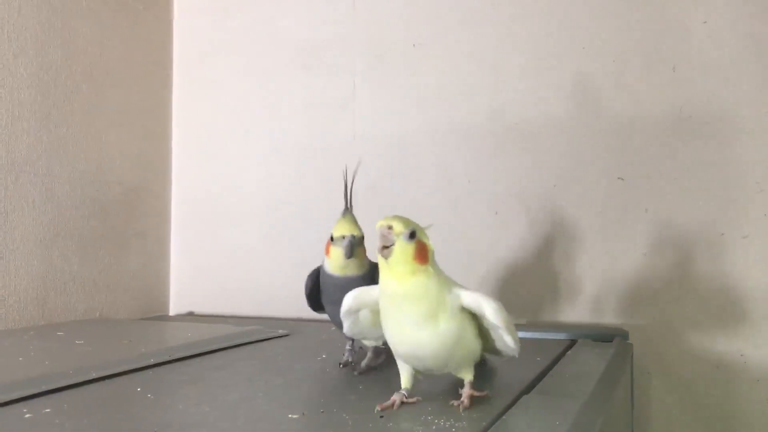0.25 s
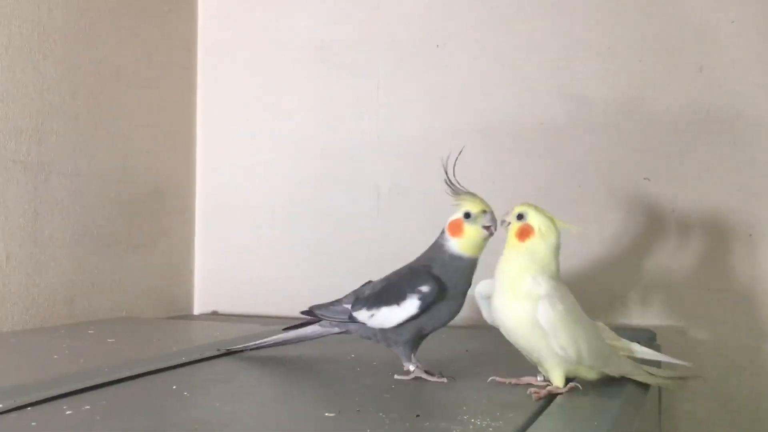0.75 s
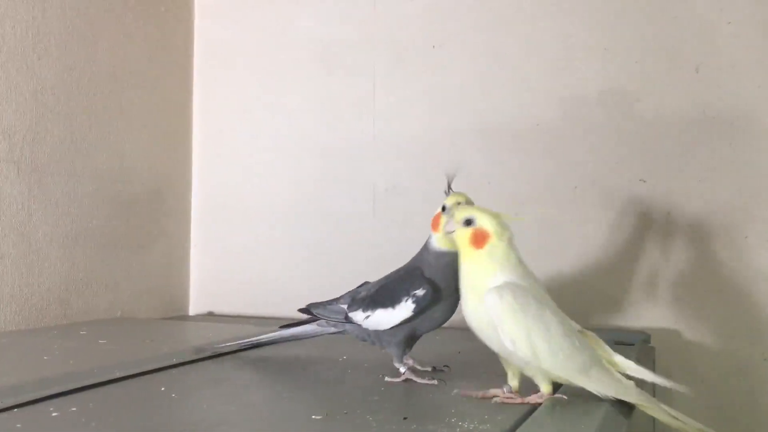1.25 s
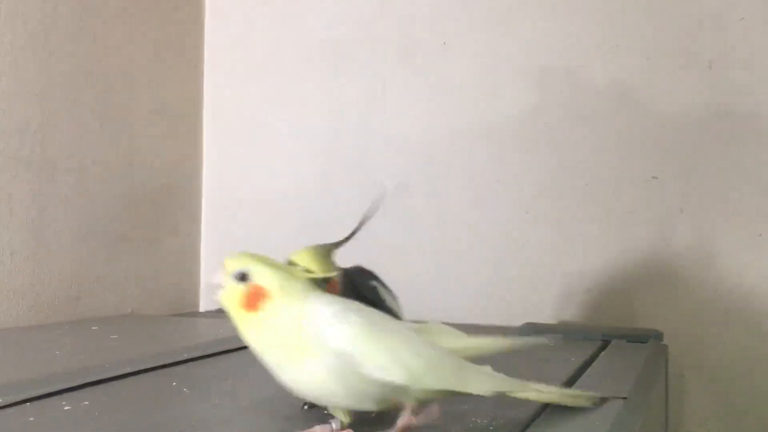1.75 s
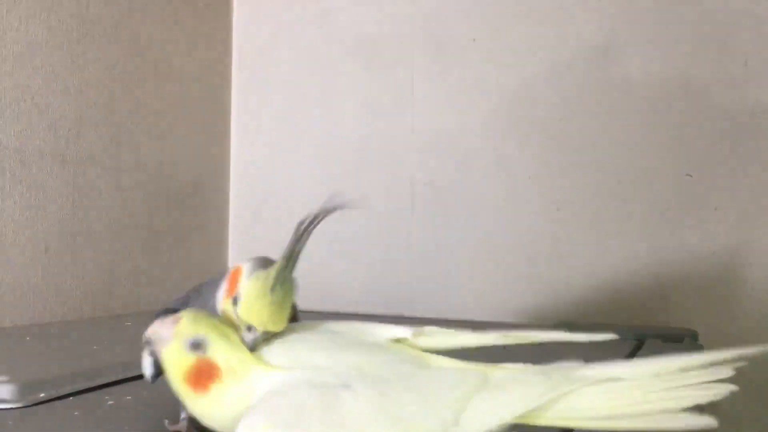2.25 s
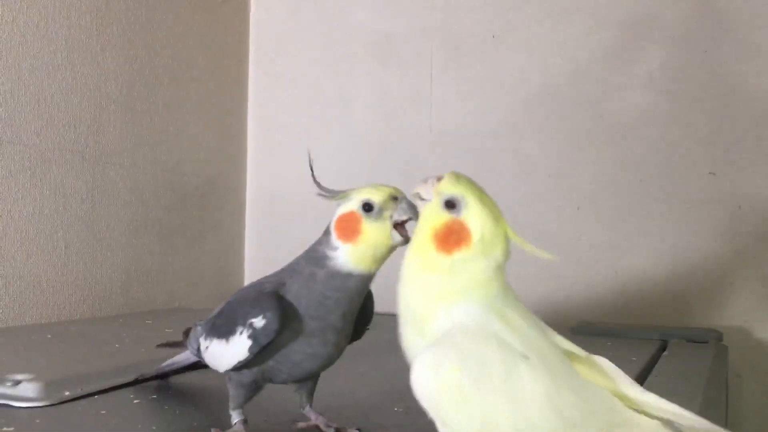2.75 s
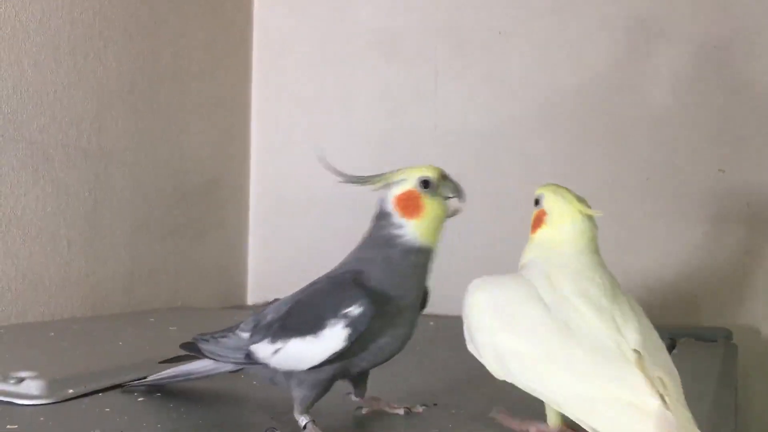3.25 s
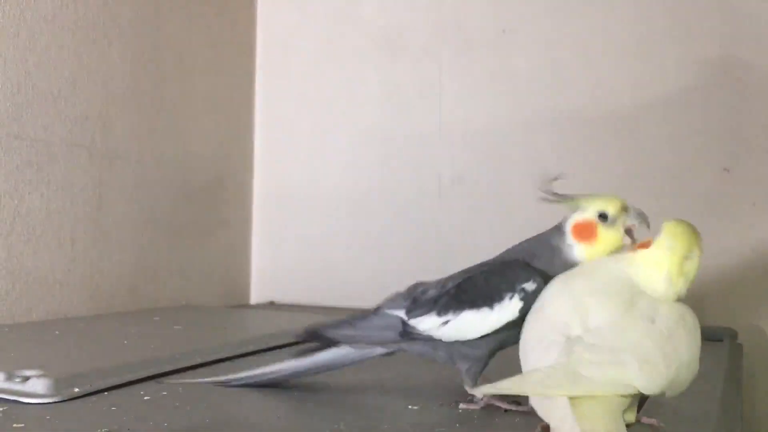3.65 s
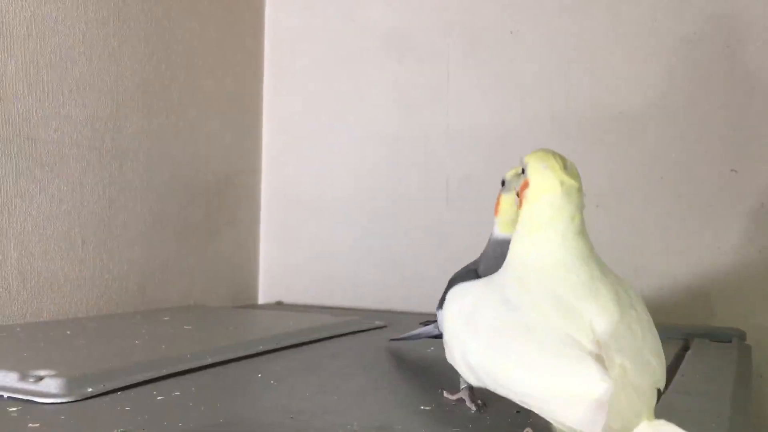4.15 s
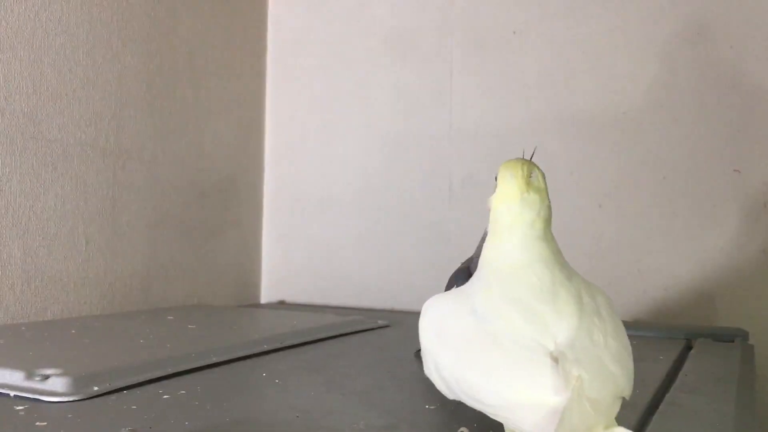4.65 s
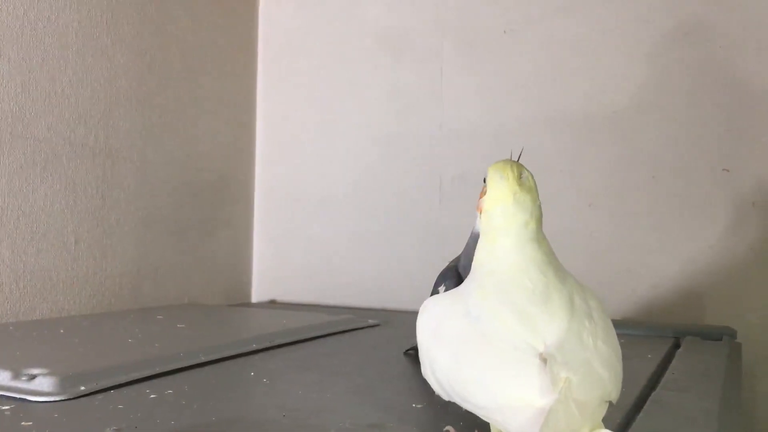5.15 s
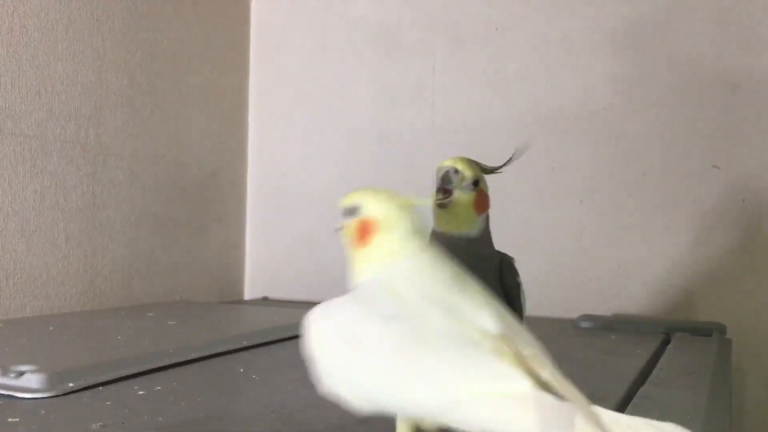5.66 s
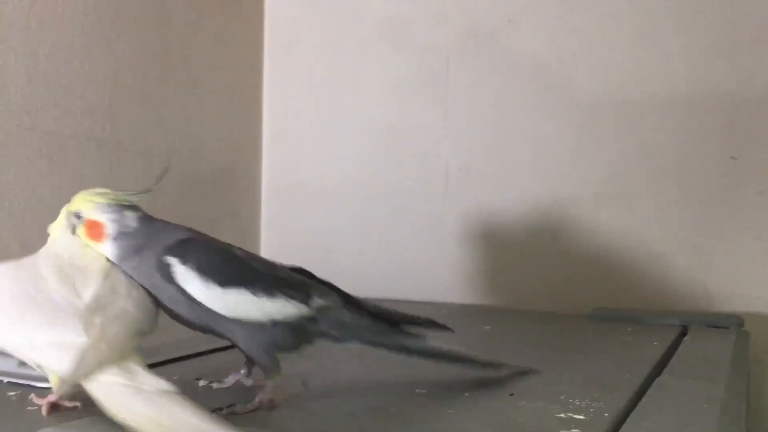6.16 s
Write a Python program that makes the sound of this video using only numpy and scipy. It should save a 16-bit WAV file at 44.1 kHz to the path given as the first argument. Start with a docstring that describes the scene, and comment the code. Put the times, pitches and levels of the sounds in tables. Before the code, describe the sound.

Over a faint low refrigerator hum, a pet cockatiel whistles a short climbing phrase, breaks into a string of high chirps and scratchy notes, then repeats the phrase. Small beak clicks and dull little footsteps come between the notes as two birds shuffle about, with a light scuffle near the end. The microphone is near, and bare walls add a short ring.

```python
"""A cockatiel courts its mate on top of a humming refrigerator in the corner of a bare room.
Its syrinx whistles short gliding notes, some pure and some rasping with fluttering membranes,
their overtones coloured by throat and beak. Beaks click; feet tap and feathers brush the top panel.
The close walls make each glide beat against its own echo."""
import sys
import numpy as np
from scipy import signal
from scipy.fft import rfft, irfft, next_fast_len
from scipy.io import wavfile
from scipy.ndimage import uniform_filter1d

SR = 44100
rng = np.random.default_rng(int(sys.argv[2]) if len(sys.argv) > 2 else 0)


def transcribe(signal):
    """Save signal, clipped to [-1, 1], as a 16-bit WAV file at the path in sys.argv[1]."""
    frames = np.atleast_2d(signal).T
    limited = np.clip(frames, -1, 1)
    pcm = np.round(limited * 32767).astype(np.int16)
    wavfile.write(sys.argv[1], SR, pcm)


N = 282681
TIME = np.arange(N) / SR
CUTOFF_HZ = 16300
SCOOP_S = .018   # time constant of a note's slide up onto its pitch

# bright spectrum of a beak or claw click: (frequency [Hz], level [dB])
CLICK_COLOUR = [(400, -19.5), (1200, 7.5), (3000, -1), (9000, 0), (16000, -4.5)]
# duller spectrum of the top panel when touched: (frequency [Hz], level [dB])
PANEL_COLOUR = [(100, -7), (650, -3.5), (1200, 3.5), (2200, -5), (4000, -13), (16000, -20)]


def from_db(db):
    return 10 ** (np.asarray(db) / 20)


def rms_one(x):
    return x / np.sqrt(np.mean(x ** 2) + 1e-20)


def follow(rows, t):
    """The columns of a breakpoint curve at times t."""
    times, *columns = np.transpose(rows)
    return [np.interp(t, times, column) for column in columns]


def at_hz(points, hz):
    """A spectrum read on a log-frequency axis."""
    freqs, values = np.transpose(points)
    return np.interp(np.log(np.maximum(hz, 1)), np.log(freqs), values)


def coloured_noise(spectrum, size):
    """Noise of rms 1 with the given spectrum."""
    hz = np.fft.rfftfreq(size, 1 / SR)
    return rms_one(irfft(rfft(rng.standard_normal(size)) * from_db(at_hz(spectrum, hz)), size))


def waver(rate_hz, size):
    """Smooth random modulation of rms 1."""
    pole = np.exp(-2 * np.pi * rate_hz / SR)
    return rms_one(signal.lfilter([1], [1, -2 * pole, pole ** 2], rng.standard_normal(2 * size))[size:])


def add(track, start_s, sound):
    """Lay a sound into a track."""
    at = max(int(start_s * SR), 0)
    track[at:at + len(sound)] += sound[:len(track) - at]


def reflections(t, order=14, sound_speed=343):
    """Mirror images of the bird in the walls, then a diffuse wash, relative to the direct sound."""
    room_m, bird_m, microphone_m = (3.3, 2.6, 2.8), (.62, .47, 1.72), (.87, .66, 1.83)
    mirrors = np.mgrid[(slice(-order, order + 1),) * 3].reshape(3, -1).T
    images = mirrors * np.array(room_m) + np.where(mirrors % 2, np.subtract(room_m, bird_m), bird_m)
    path = np.linalg.norm(images - microphone_m, axis=1)
    direct = path.min()
    lag = np.round((path - direct) / sound_speed * SR).astype(int)
    polarity = (-1.) ** mirrors.sum(axis=1)
    early = np.bincount(lag, (lag > 0) * polarity * direct / path, len(t))[:len(t)]
    late = direct * np.sqrt(4 * np.pi * sound_speed / (np.prod(room_m) * SR)) * rng.standard_normal(len(t))
    return np.where(t < (order - 1) * min(room_m) / sound_speed, early, late)


def room(x, wet_db=0.03):
    """Direct sound plus the ring of bare walls, whose treble dies first."""
    # reverb decay by band: (frequency [Hz], T60 [s])
    decay = [(2500, 0.27), (5500, 0.26), (9000, 0.14), (16000, 0.22)]
    centres, t60s = np.transpose(decay)
    t = TIME[:SR * 2 // 3]
    hz, echoes = np.fft.rfftfreq(len(t), 1 / SR), rfft(reflections(t))
    response = 0
    for share, t60 in zip(np.eye(len(centres)), t60s):
        band = irfft(echoes * at_hz(np.c_[centres, share], hz), len(t))
        response += band * from_db(-60 * t / t60)
    return x + from_db(wet_db) * signal.fftconvolve(x, response)[:N]


def refrigerator(unsteady=0.24, rush_db=-54.5):
    """Wavering compressor tones over a soft rush of air."""
    # compressor tones: (frequency [Hz], level [dB])
    tones = [(39.2, -61.5), (60, -65), (85.5, -59.5), (89.2, -56), (170, -77.5), (236, -78.5)]
    # spectrum of the rush: (frequency [Hz], level [dB])
    rush_colour = [(18, -30), (30, 0), (95, -6), (374, -19.5), (499, -17), (632, -20.5), (1960, -22.5),
                   (4910, -37.5), (13300, -39), (16000, -46)]
    hum = 0
    for hz, db in tones:
        tone = np.sqrt(2) * np.sin(2 * np.pi * (hz * TIME + rng.random()))
        hum += from_db(db) * tone * (1 + unsteady * waver(2.2, N))
    return hum + from_db(rush_db) * coloured_noise(rush_colour, next_fast_len(N))[:N]


def scuffle(grain_db=4):
    """Feathers and claws brush the panel, soft and grainy, while the birds move."""
    # brushing envelope: (time [s], level [dB])
    brushing = [(1.38, -77), (1.56, -55), (2.1, -60.5), (2.7, -72), (5.5, -71.5), (5.72, -59.5),
                (5.91, -68.5), (5.99, -49.5), (6.08, -60.5)]
    level_db, = follow(brushing, TIME)
    envelope = from_db(level_db + grain_db * waver(50, N))
    return envelope * coloured_noise(PANEL_COLOUR, next_fast_len(N))[:N]


def knocks(events, colour, t60, gain_db, rise_s=.002):
    """Each contact is a short burst of dense, quickly dying vibration."""
    out, t = np.zeros(N), TIME[:SR // 10]
    for start_s, level_db in events:
        envelope = from_db(level_db + gain_db - 60 * t / t60) * np.minimum(t / rise_s, 1)
        add(out, start_s, coloured_noise(colour, len(t)) * envelope)
    return out


def claws(count=28, mean_db=-52, spread_db=4):
    """Faint random ticks of claws as the birds shuffle about."""
    draws = rng.random((count, 2))
    ticks = [(when * TIME[-1], mean_db + spread_db * (2 * force - 1)) for when, force in draws]
    return knocks(ticks, CLICK_COLOUR, t60=0.0054, gain_db=-3.5)


def feet():
    """Feet land on the top panel with dull taps."""
    # footfalls: (time [s], relative level [dB])
    steps = [(.289, -40.5), (1.518, -41), (1.598, -33.5), (1.768, -39), (1.878, -59), (2.04, -34.5),
             (2.078, -31.5), (2.2614, -42.5), (2.5367, -36.5), (4.128, -39.5), (5.8018, -34),
             (5.8746, -40.5), (5.939, -38), (6.0103, -29.5), (6.1186, -28.5), (6.2229, -32)]
    return knocks(steps, PANEL_COLOUR, t60=0.062, gain_db=-2.5)


def beaks():
    """Hard beaks make short, bright clicks."""
    # beak contacts: (time [s], relative level [dB])
    clicks = [(.870, -26.5), (1.006, -47), (1.226, -50.5), (1.403, -39.5), (1.516, -48), (1.592, -28.5),
              (1.669, -29.5), (1.878, -32.5), (2.332, -34), (2.803, -30), (3.284, -42.5), (3.607, -30.5),
              (3.859, -22.5), (5.502, -51), (5.565, -49), (6.341, -32)]
    return knocks(clicks, CLICK_COLOUR, t60=0.053, gain_db=-2.0)


def moments(length_s, count=200):
    """Times within a note, and the share of it that has gone by."""
    share = np.linspace(0, 1, count)
    return share * length_s, share


def effort(t, attack_s, start_db, release_s, end_db):
    """Attack, hold and release of a note, in dB from its full level."""
    return start_db * np.maximum(1 - t / attack_s, 0) + end_db * np.maximum(1 - (t[-1] - t) / release_s, 0)


def dip(t, after_s, depth_db, width_s=.018):
    """A brief hollow in the fundamental, in dB."""
    return depth_db * np.exp(-((t - after_s) / width_s) ** 2)


def tune(shape, length_s, low_hz, high_hz, level_db, overtone_db):
    """A practised tune stretched to a length and range: curves of time, pitch, level and overtones."""
    share, climb, loud_db, bright_db = np.transpose(shape)
    pitch = low_hz * (high_hz / low_hz) ** climb
    return (share - share[0]) * length_s, pitch, level_db + loud_db, overtone_db + bright_db


def rise(*settings):
    """A whistle that pauses on a step and then climbs."""
    # rising tune: (time [share of length], pitch [share of range], level [dB], overtones [dB])
    shape = [(0, 0.059, -26, -7.5), (.15, .22, -5, -5), (.33, .29, -9.5, 0), (.47, .62, 1, -0.5),
             (.645, .745, 1.5, -3.5), (.8, .895, -4.5, -0.5), (1, 0.96, -15, 0)]
    return tune(shape, *settings)


def arch(length_s, low_hz, high_hz, level_db, overtone_db, flat, step_share=0.28, step_width=.13):
    """A whistle that climbs three steps and falls away; the first step may land flat."""
    # arched tune: (time [share of length], pitch [share of range], level [dB], overtones [dB])
    shape = [(0, .02, -30.5, -4), (.12, 0.045, -14.5, -14), (.205, 0.24, -13.5, -9),
             (.275, 0.57, -2.5, -6.5), (.41, 0.58, 0.5, -1), (.555, 0.73, 0.5, 9.5), (.645, .93, -1.5, 7),
             (.785, 0.98, 0.5, 2), (.885, 0.91, -2.5, 3), (1, 0.215, -12, -22)]
    t, pitch, loud_db, bright_db = tune(shape, length_s, low_hz, high_hz, level_db, overtone_db)
    bend = -flat * np.exp(-((t / length_s - step_share) / step_width) ** 2)
    return t, pitch * 2 ** (bend / 12), loud_db, bright_db


def glide(from_hz, to_hz, share, semitones):
    """An even slide between two pitches, with a bend on top."""
    return from_hz * (to_hz / from_hz) ** share * 2 ** (semitones / 12)


def sweep(length_s, from_hz, to_hz, scoop, level_db, dip_s, dip_db, first_overtone_db, last_overtone_db):
    """A note scooped from below that starts bright and mellows as it glides."""
    t, share = moments(length_s)
    pitch = glide(from_hz, to_hz, share, semitones=-scoop * np.exp(-t / SCOOP_S))
    loud_db = effort(t, attack_s=0.036, start_db=-15, release_s=0.018, end_db=-5.5)
    bright_db = first_overtone_db + (last_overtone_db - first_overtone_db) * share
    hollow_db = dip(t, dip_s, dip_db)
    return t, pitch, level_db + loud_db + hollow_db, bright_db - hollow_db


def chirp(length_s, from_hz, to_hz, warble_s, depth, width_s, level_db, swell_db, overtone_db, scoop=1.3):
    """A short high glide whose pitch swings once, overshooting before and after."""
    t, share = moments(length_s)
    away = ((t - warble_s) / width_s) ** 2
    warble = depth * (1 - 2 * away) * np.exp(-away)
    pitch = glide(from_hz, to_hz, share, semitones=warble - scoop * np.exp(-t / SCOOP_S))
    loud_db = effort(t, attack_s=0.036, start_db=-12, release_s=0.024, end_db=-13.5)
    loud_db += swell_db * (share - .5)
    thin_db = -2.5 * warble   # the voice thins as it flicks up and fills as it dips
    return t, pitch, level_db + loud_db + thin_db, overtone_db - thin_db


def held(length_s, from_hz, to_hz, bow, plunge_s, plunge, level_db, dip_s, dip_db, overtone_db,
         brighten_db=17, dull_db=-19):
    """A gently curved whistle that grows brighter, then drops in pitch and goes dull."""
    t, _ = moments(length_s)
    hold_s = length_s - plunge_s
    share, fall = np.minimum(t / hold_s, 1), np.maximum(t - hold_s, 0) / plunge_s
    pitch = glide(from_hz, to_hz, share, semitones=bow * np.sin(np.pi * share) - plunge * fall)
    loud_db = effort(t, attack_s=0.039, start_db=-19, release_s=0.044, end_db=-12.5)
    bright_db = overtone_db + brighten_db * (share - .5) + dull_db * fall
    hollow_db = dip(t, dip_s, dip_db)
    return t, pitch, level_db + loud_db + hollow_db, bright_db - hollow_db


def syrinx(curves, rasp, tilt, nasal_db=0):
    """One whistle: a fundamental, overtones coloured by the throat, and rasp from fluttering membranes."""
    # how throat and beak pass the overtones: (frequency [Hz], gain [dB])
    throat = [(2200, 13.5), (3000, -5), (3700, -5), (4700, -7.5), (5600, -5.5), (6700, -16.5),
              (7800, -14.5), (9200, -27), (10700, -27), (12700, -17), (15500, -24)]
    # spectrum of the breath: (frequency [Hz], level [dB])
    breath_colour = [(500, -30), (1300, 3), (2700, -8), (3700, -2.5), (7000, -15.5), (16000, -18.5)]
    attack_s, release_s, settle_s, voice_db = 0.0034, .008, 0.083, -2.0
    flutter_hz, flutter_depth, flutter_bend = 92, 0.55, 0.07
    nasal_hz, nasal_octaves = 3650, 0.29
    t = np.arange(0, curves[0][-1] + release_s, 1 / SR)
    size = len(t)
    pitch, level_db, overtone_db = follow(np.column_stack(curves), t)
    pitch = uniform_filter1d(pitch, SR // 100, mode="nearest")   # muscles round the corners of a glide
    # a harsh note starts with fluttering membranes, then settles; a plunge breaks the tone up again
    plunge = np.clip(-np.gradient(np.log2(pitch)) * SR - 6, 0, 10)   # octaves per second beyond 6
    strain = rasp * np.exp(-t / settle_s)
    rough = np.minimum(strain + 0.084 * plunge, 1)
    flutter_rate = flutter_hz * (1 + 0.11 * waver(30, size))
    flutter = rough * np.sin(2 * np.pi * np.cumsum(flutter_rate) / SR)
    jitter = .0022 * waver(120, size)
    wobble = 0.03 * rasp * waver(38, size)
    chaos = .035 * rough * waver(600, size)
    pitch = pitch * (1 + jitter + wobble + chaos + flutter_bend * flutter)
    phase = 2 * np.pi * np.cumsum(pitch) / SR
    tone = np.sin(phase)
    for k in range(2, int(CUTOFF_HZ / pitch.min()) + 1):
        hz = k * pitch
        colour_db = at_hz(throat, hz) + tilt * np.log2(hz / 5000)
        ring_db = nasal_db * np.exp(-(np.log2(hz / nasal_hz) / nasal_octaves) ** 2)
        shimmer_db = 3.5 * waver(28, size)
        tone += from_db(overtone_db + colour_db + ring_db + shimmer_db) * (hz < SR / 2) * np.sin(k * phase)
    # unequal alternate cycles put weak tones either side of the fundamental, growing with the rasp
    halves = from_db(-8.5) * np.sin(phase / 2) + np.sin(phase + phase / 2)
    half_db = -35 + 16.5 * np.log10(rasp + 1e-9)
    # strain lets more air hiss past
    breath = (from_db(-52) + from_db(-21) * strain) * coloured_noise(breath_colour, size)
    voice = np.sqrt(2) * (tone + from_db(half_db) * halves) + breath
    gate = np.clip(t / attack_s, 0, 1) * np.clip((t[-1] - t) / release_s, 0, 1)
    return from_db(level_db + voice_db) * gate * voice * (1 + flutter_depth * flutter)


def cockatiel():
    """The courtship song: five kinds of gesture steer the pitch, level and brightness of the syrinx."""
    # rising whistles: (time [s], length [s], low [Hz], high [Hz], relative level [dB], overtones [dB],
    # rasp [0-1], tilt [dB/octave])
    rises = [(0.053, .188, 1833, 2950, -12.5, -22, 0.23, 6.5),
             (4.623, 0.19, 1899, 2789, -11.5, -22, 0.05, 3)]
    # long arched whistles: (time [s], length [s], low [Hz], high [Hz], relative level [dB],
    # overtones [dB], first step flat by [semitones], rasp [0-1], tilt [dB/octave])
    arches = [(0.397, .415, 1063, 2044, -19.5, -24, -.1, 0.23, -4.5),
              (4.976, .42, 1063, 1957, -21, -25, 0.98, 0.24, -8.5)]
    # warbled chirps: (time [s], length [s], from [Hz], to [Hz], warble after [s], warble [semitones],
    # warble width [s], relative level [dB], swell [dB], overtones [dB], rasp [0-1], tilt [dB/octave])
    chirps = [(1.795, 0.08, 2620, 2873, .054, 0, 0.026, -13, -2, -17.5, .23, -8),
              (2.022, 0.16, 2566, 3009, 0.14, -1.2, .028, -14, 7.5, -23.5, 0.4, 3),
              (2.328, 0.17, 2661, 3040, 0.12, -1.48, 0.026, -13.5, -2, -24.5, 0.43, 8),
              (3.478, .066, 2549, 2293, 0.074, -0.25, 0.025, -13.5, -1.5, -20.5, 0.5, 3),
              (3.747, .076, 2602, 2883, .052, -1.57, .013, -11.5, -4, -18.5, 0.2, -3.5),
              (3.982, 0.17, 2839, 2550, 0.1, 2.02, .027, -17.5, -4, -22, 0.4, -0.5),
              (6.316, 0.054, 2510, 2680, 0.057, -2, 0.023, -7, 8.5, -20, 0.34, -15)]
    # held whistles: (time [s], length [s], from [Hz], to [Hz], bow [semitones], plunge length [s],
    # plunge [semitones], relative level [dB], dip after [s], dip [dB], overtones [dB], rasp [0-1],
    # tilt [dB/octave])
    holds = [(2.799, .28, 1919, 1850, 0.1163, 0.045, 5.6, -18, 0.013, -1, -21.5, 0.4, 0),
             (4.288, .184, 1955, 2332, .8, .026, 8.8, -11.5, 0.071, -14, -19, 0.09, -7.5)]
    # harsh upsweeps: (time [s], length [s], from [Hz], to [Hz], scoop [semitones], relative level [dB],
    # dip after [s], dip [dB], first overtones [dB], last overtones [dB], rasp [0-1], tilt [dB/octave],
    # nasal ring of the open beak [dB])
    sweeps = [(1.597, .16, 1921, 2225, 3.85, -15.5, 0.12, -2, -.5, -22.5, 0.39, -6, 3.5),
              (2.652, 0.091, 2322, 2917, 2.4, -11, 0.0037, -6.5, -21.5, -22, 0.27, 2.5, -1),
              (3.385, 0.1, 1548, 2083, 0.3, -13.5, 0.046, -8.5, -2, -13, .65, 0.5, 13),
              (3.533, .165, 1677, 2147, .5, -17.5, .072, -23, -12.5, -14, 0.5, -6, -2),
              (6.122, .151, 2000, 1963, 3.9, -16.5, 0.04, -8.5, 2, -17, 0.49, -4.5, -3.5)]
    song = np.zeros(N)
    for gesture, notes in (rise, rises), (arch, arches), (chirp, chirps), (held, holds):
        for start_s, *settings, rasp, tilt in notes:
            add(song, start_s, syrinx(gesture(*settings), rasp, tilt))
    for start_s, *settings, rasp, tilt, nasal_db in sweeps:
        add(song, start_s, syrinx(sweep(*settings), rasp, tilt, nasal_db))
    return song


def scene():
    """The birds ring in the room over the bed of refrigerator hum, in mono."""
    birds = beaks() + feet() + cockatiel() + claws() + scuffle()
    return (room(birds) + refrigerator())[None]


def record(dry):
    """The microphone drops the deepest bass; the top is cut steeply."""
    dry = signal.sosfilt(signal.butter(8, 31, "high", fs=SR, output="sos"), dry)
    return signal.sosfilt(signal.ellip(10, .2, 80, CUTOFF_HZ, fs=SR, output="sos"), dry)


dry = scene()
out = record(dry)
transcribe(out)
```